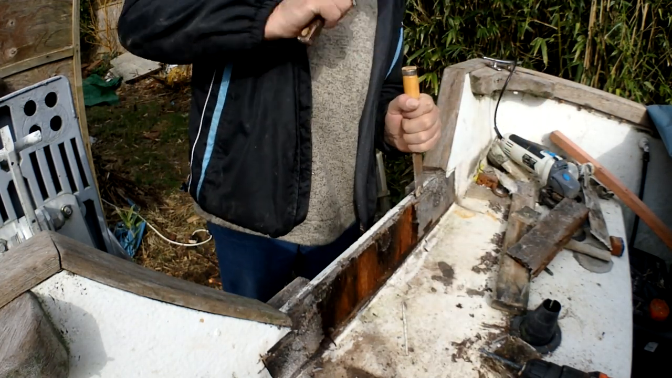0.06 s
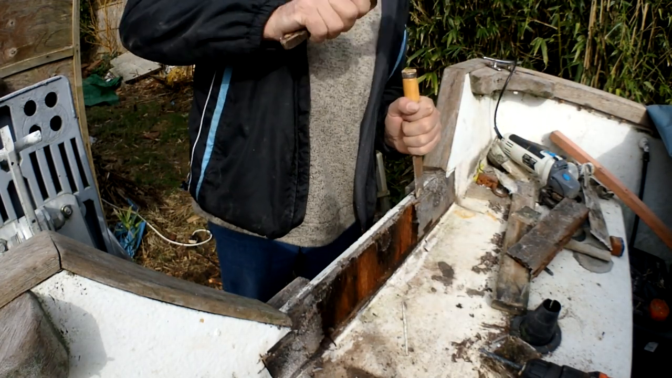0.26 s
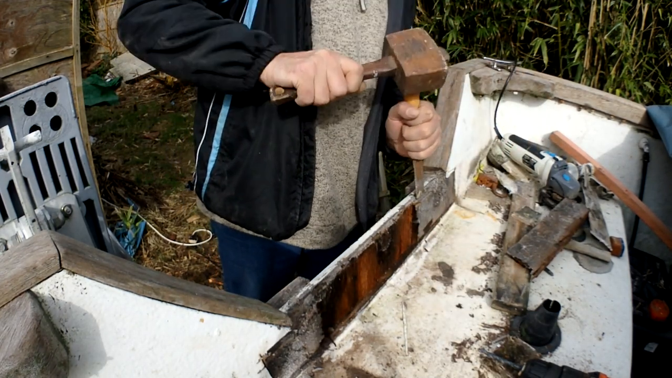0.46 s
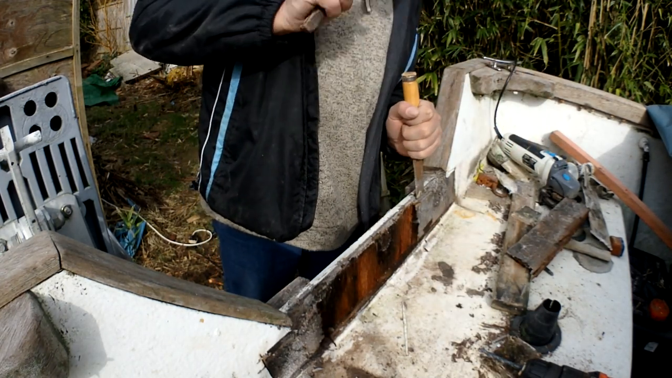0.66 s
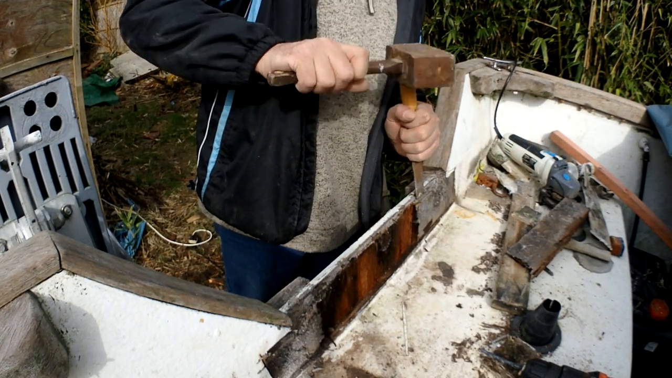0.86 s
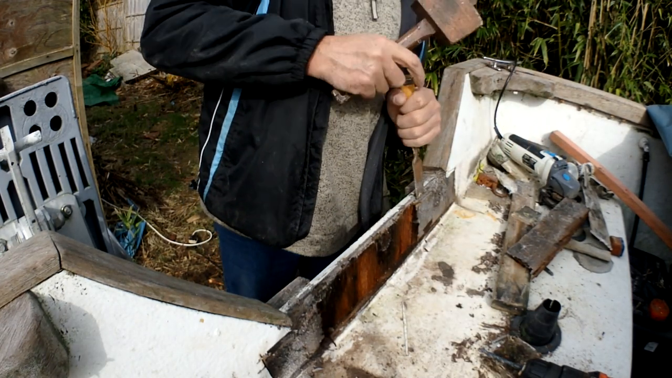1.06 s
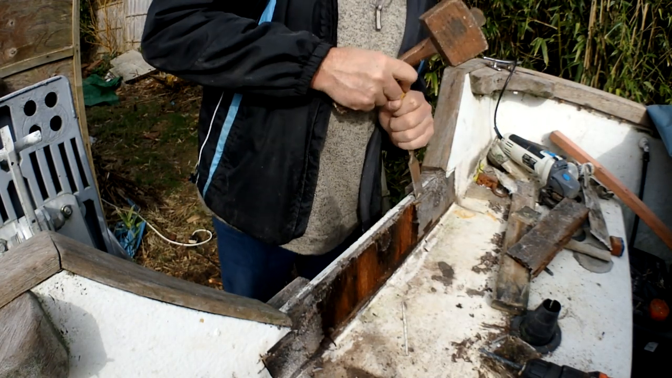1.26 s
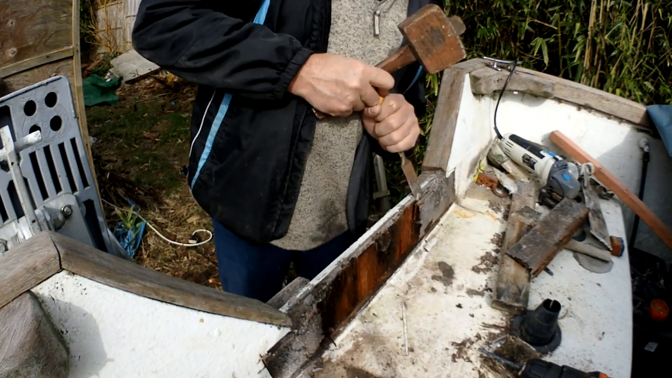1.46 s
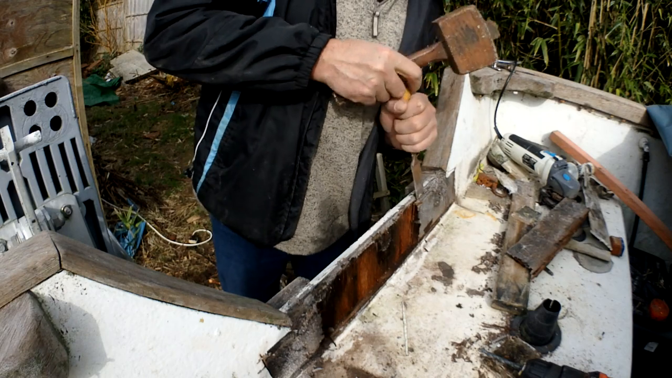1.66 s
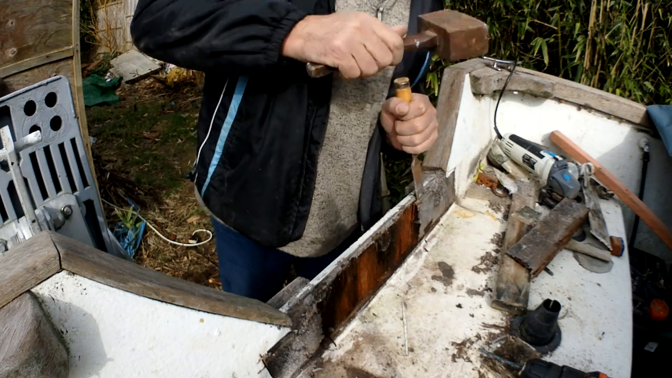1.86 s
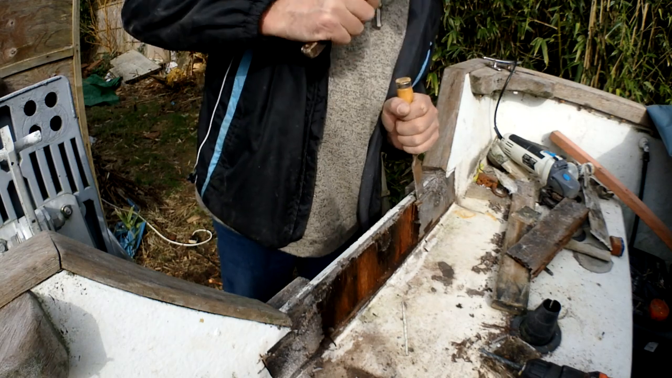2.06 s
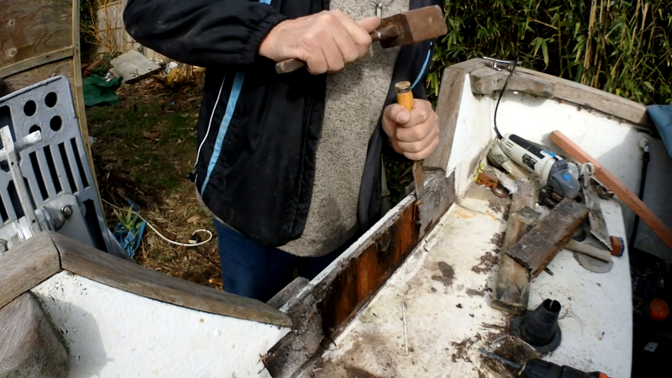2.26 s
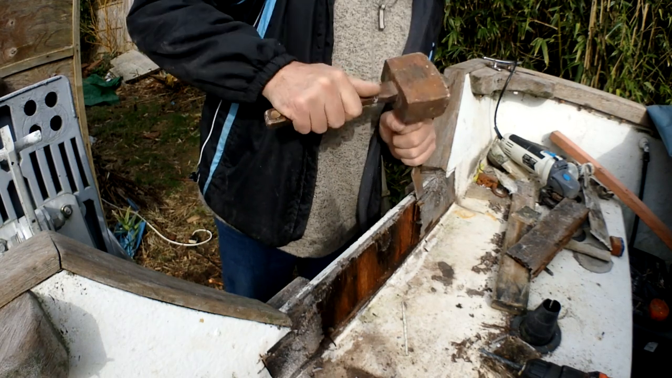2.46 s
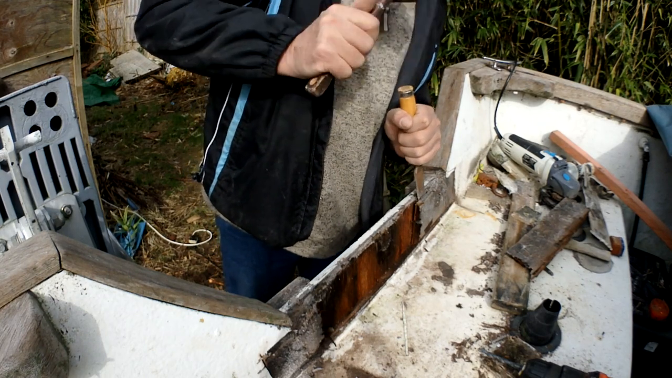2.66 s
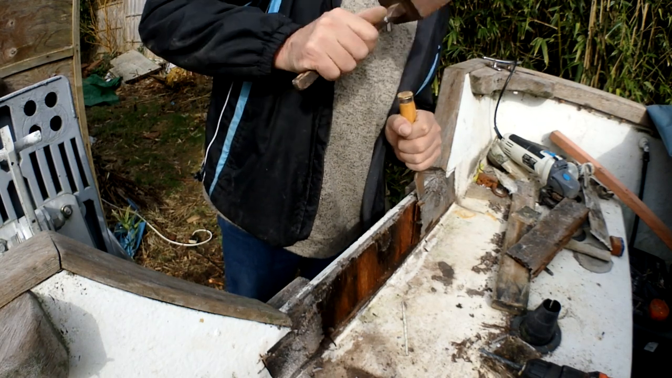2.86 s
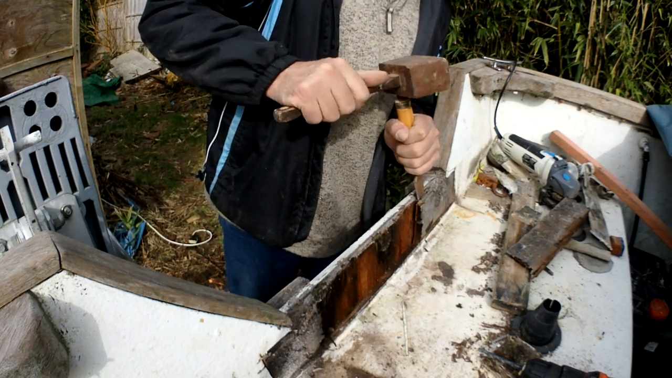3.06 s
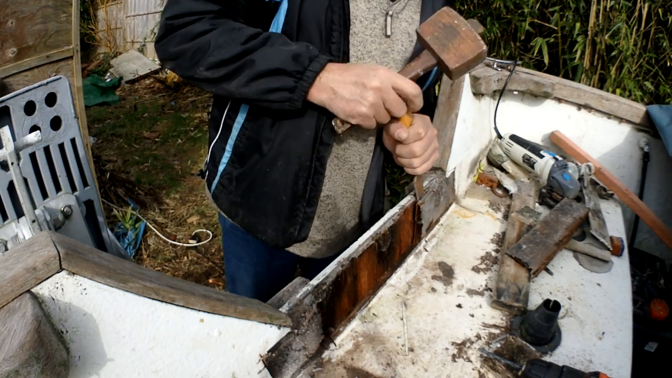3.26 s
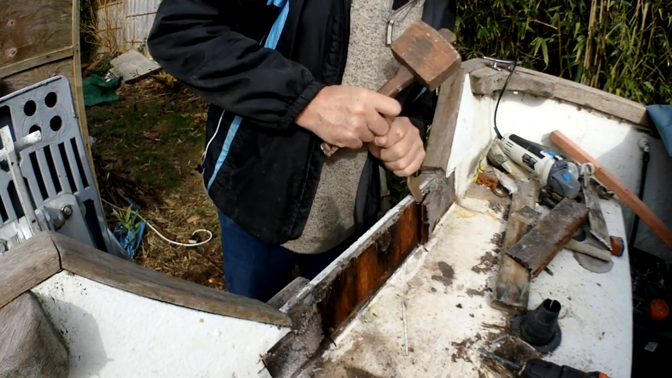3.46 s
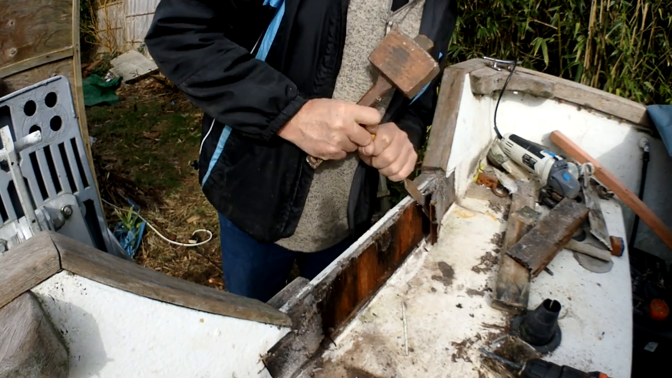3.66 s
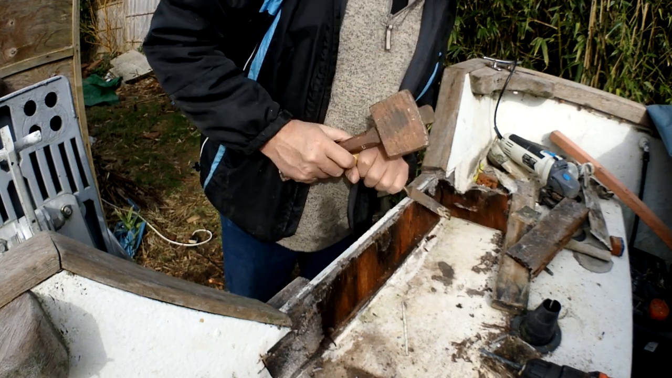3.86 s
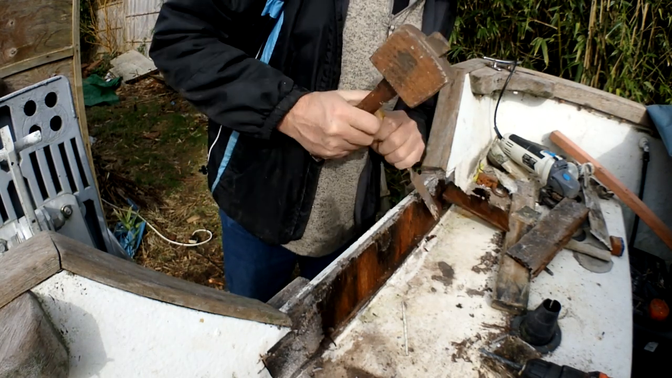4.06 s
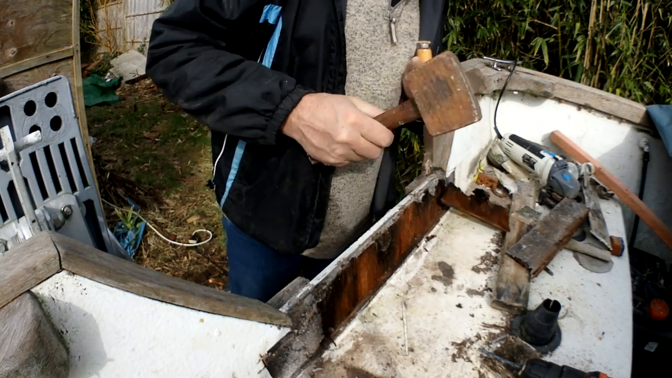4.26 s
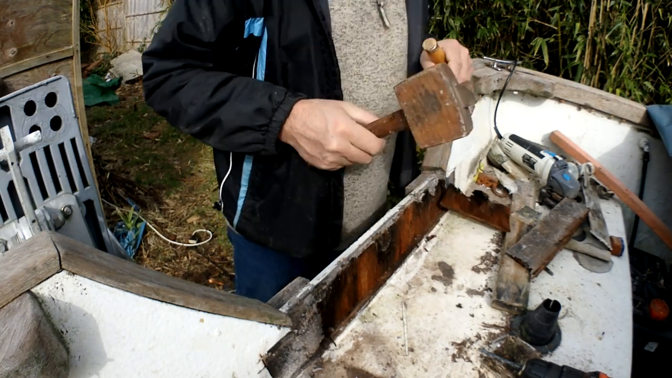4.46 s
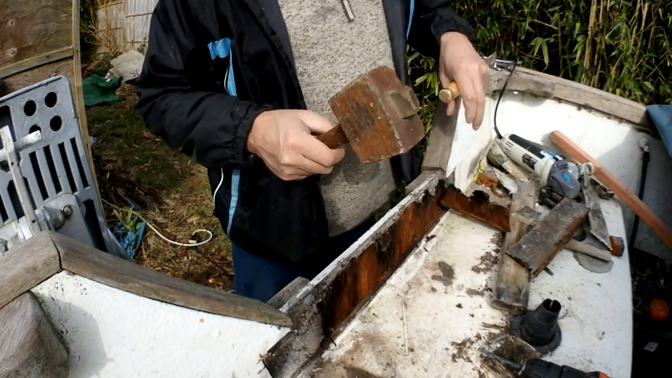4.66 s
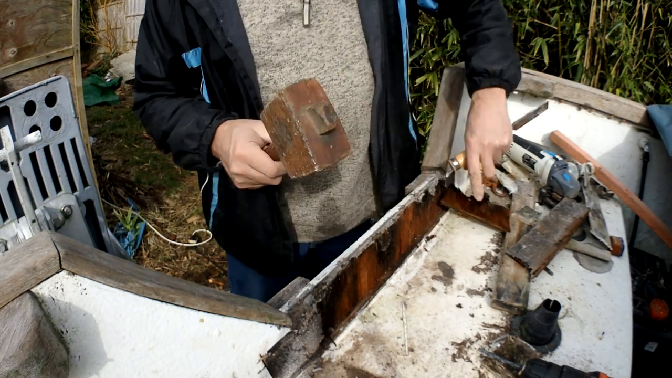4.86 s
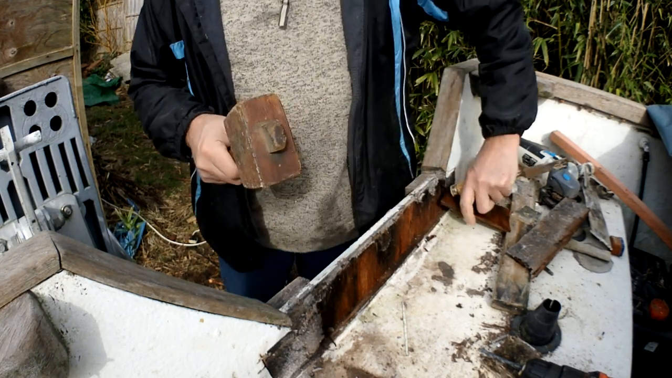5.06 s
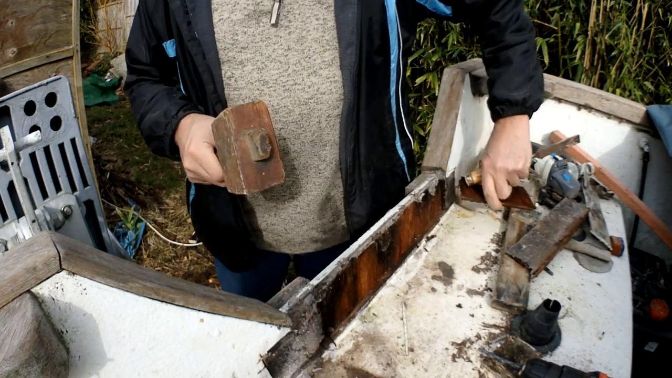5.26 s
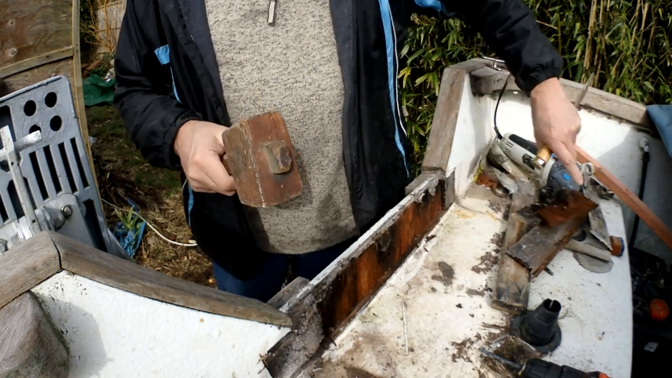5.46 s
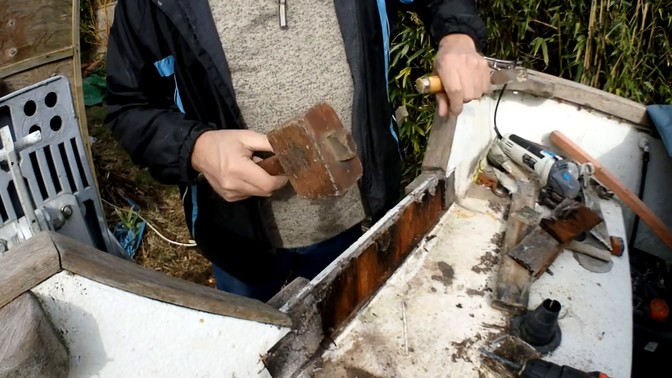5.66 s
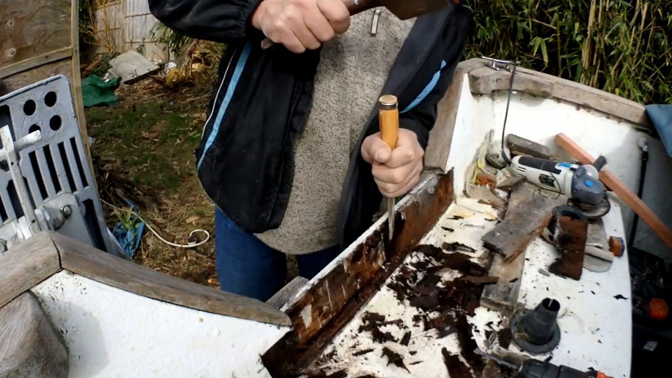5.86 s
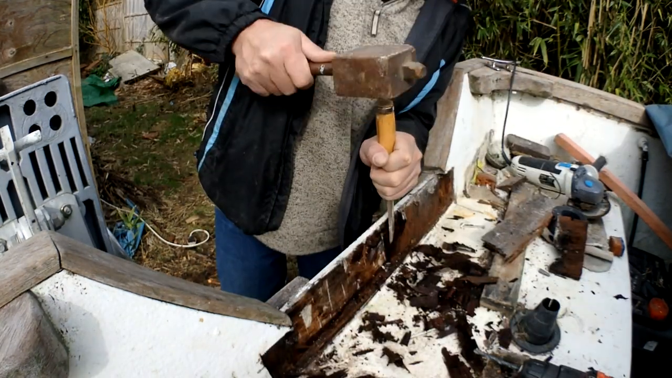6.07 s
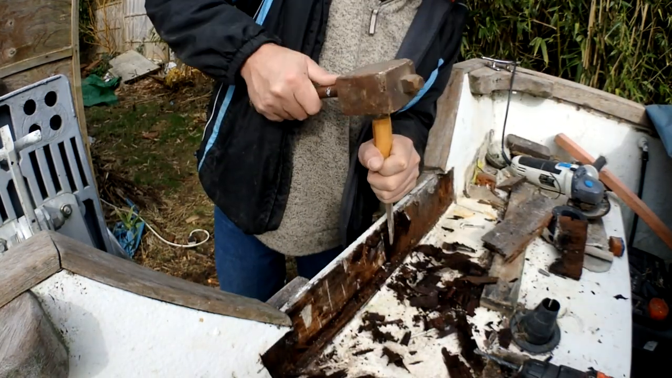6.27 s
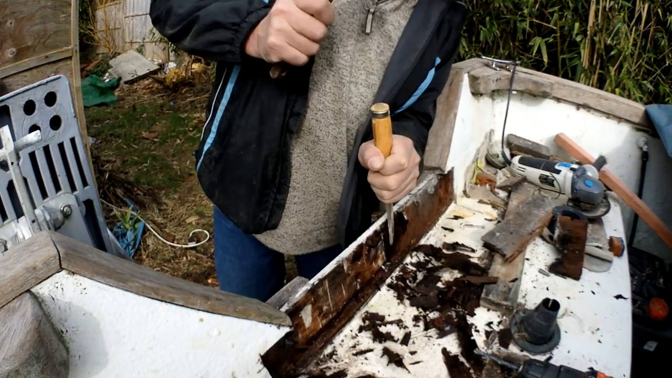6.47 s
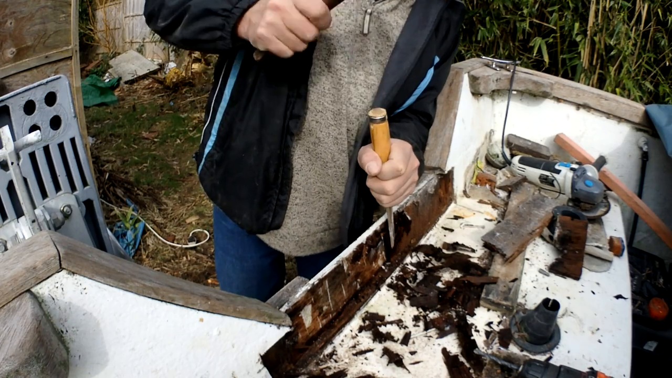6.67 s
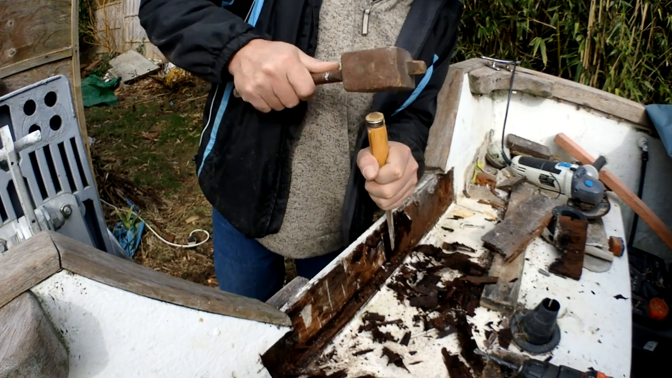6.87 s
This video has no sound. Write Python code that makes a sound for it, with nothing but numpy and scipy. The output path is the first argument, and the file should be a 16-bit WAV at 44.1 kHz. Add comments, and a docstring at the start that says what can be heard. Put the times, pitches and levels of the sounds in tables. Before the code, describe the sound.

Close outdoor stereo pickup of a mallet striking a chisel on a hollow boat hull. Three quick hard knocks, a pause with faint wood crackle and cloth rustle, four more blows, then a splintering snap and a loud crack as rotten wood comes away. Soft rustling and small clatter follow; after a tiny dropout, five evenly spaced knocks finish.

```python
"""Mallet and chisel on rotten planking

A wooden mallet drives a chisel in an open yard: short tool modes crack, longer modes of the hollow hull drum along,
band-wise noise gives the echoes. Between blows the levered chisel snaps fibres (clicks and noise bursts), pieces
fall and bounce, a block tocks, cloth and crumbs rustle (grainy noise) over an outdoor hum (smooth noise), and a
faint narrow tone comes and goes. The sound fades out and back once, within 0.1 s, before the last five blows."""
import sys
import numpy as np
from scipy import signal
from scipy.io import wavfile

SR = 44100
rng = np.random.default_rng(int(sys.argv[2]) if len(sys.argv) > 2 else 0)


def wav_record(signal):
    """Record a signal, one row per channel, as 16-bit PCM in the file named by sys.argv[1]."""
    frames = np.transpose(np.atleast_2d(signal))
    bounded = np.clip(frames, -1, 1)
    # unit amplitude maps onto the largest positive 16-bit level
    quanta = np.round(bounded * 32767).astype(np.int16)
    wavfile.write(sys.argv[1], SR, quanta)


N = 304731
SILENCE_S = 5.745   # bottom of the fade; no hit rings across it

# Mallet on chisel. Each row: start in seconds, level in dB, hull boom in dB, knock in dB, clack in dB,
# steel ring in dB, treble edge in dB, pitch factor of the tool.
BLOWS = [(0.175, -4, 8.5, 4, -0.5, -2.5, -42.5, 1.035), (0.505, -4.5, 5.5, 6, -4.5, -2.5, -44, 1.033),
         (0.827, -5, -4, -4, 3.5, -0.5, -5, 1.06), (2.214, -4.5, 8.5, -2.5, 3, -3, 6, 1.106),
         (2.5, -3.5, 2.2, -7.5, 0.5, -2.5, 2.5, 1.107), (2.775, -7, 1, -3.5, 1, 3, -3.5, 1.07),
         (3.033, -9, -5.5, -2, 4, 1, 5.5, 1.203), (5.799, -5, -5.5, 0.5, -4.5, 0.5, -1, 1.035),
         (6.056, -7.5, -4.5, 0.5, -2, 1, -5.5, 1.048), (6.319, -7.5, -2, 2, -2.8, 0, -1, 1.025),
         (6.575, -8, -0.5, 3, -3, -1.5, -15.5, 1.013), (6.836, -7, 3, 3, -1.5, -2.5, -4, 1.02)]
# Wood breaking off, falling and bouncing on the hull. Each row: start in seconds, level in dB, hull boom in dB,
# knock in dB, clack in dB, treble edge in dB, pitch factor of the plank, left-right in dB, late echo in dB.
PIECES = [(1.46, -30, -13, -4.5, 2.5, -7, 0.88, -5.5, 2.5),
          (3.739, -5, -29.5, -11.5, 0.5, -9, 1.03, -5.5, -2.5),
          (5.562, -22, 9, 20.5, 18.5, -26, 0.91, -6.5, 4.5),
          (5.57, -19.5, 4.5, -12.5, 6.5, -47.5, 0.83, -8.5, 0),
          (5.591, -25.5, -6.5, -13.5, -11.5, -29.5, 0.98, -1, 1),
          (5.657, -11.5, -13, -3, 14, -41, 0.94, -7.5, 6)]


def from_db(db):
    """Gain of a level in dB."""
    return 10 ** (np.asarray(db) / 20)


def in_time(rows):
    """A curve (s, value) read at every sample."""
    return np.interp(np.arange(N) / SR, *np.transpose(rows))


def at_hz(points, hz):
    """A table (Hz, value) read on a log-frequency axis."""
    points = np.array(points)
    return np.interp(np.log(hz), np.log(points[:, 0]), points[:, 1])


def drift(rate_hz):
    """Slow random curve of spread 1: noise through two equal low-pass poles, at a 40th of the sample rate."""
    r = np.exp(-80 * np.pi * rate_hz / SR)
    slow = signal.lfilter([1], [1, -2 * r, r * r], rng.standard_normal(N // 40 + 2002))
    slow = slow[2000:]   # settled part
    return np.interp(np.arange(N) / 40, np.arange(len(slow)), slow / slow.std())


def band_pass(x, low_hz, high_hz):
    """Second-order Butterworth band-pass."""
    return signal.sosfilt(signal.butter(2, [low_hz, high_hz], "band", fs=SR, output="sos"), x)


def resonance(x, hz, width_hz):
    """Band-pass with gain 1 on top."""
    r = np.exp(-np.pi * width_hz / SR)
    zeros = np.array([1, 0, -1]) * (1 - r * r) / 2
    return signal.lfilter(zeros, [1, -2 * r * np.cos(2 * np.pi * hz / SR), r * r], x)


def ring(hz, t60_s, lead_rad, rise_cycles):
    """One mode swelling over some cycles and dying away, the left side leading in phase."""
    t = np.arange(int(t60_s * SR * 1.2)) / SR
    onset = 1 - np.exp(-t * hz / rise_cycles)
    phase = 2 * np.pi * hz * t + lead_rad / 2 * np.array([[1], [-1]])
    return onset * from_db(-60 * t / t60_s) * np.sin(phase)


def noise_bands():
    """Noise bands 0.4 octave wide: centre in Hz, width in Hz and two unrelated signals of rms 1."""
    edges_hz = 28 * 2 ** np.arange(0, 9.4, .4)
    white = rng.standard_normal((2, 2, N))
    for k, (low, high) in enumerate(zip(edges_hz, edges_hz[1:])):
        pair = band_pass(white[k % 2], low, high)   # neighbours use different noise
        yield np.sqrt(low * high), high - low, pair / pair.std()


def stereo(pair, likeness):
    """Left and right from a shared and an opposed noise."""
    alike = np.clip(likeness, -1, 1)
    shared = np.sqrt(1 + alike) * pair[0]
    opposed = np.sqrt(1 - alike) * pair[1] * [[1], [-1]]
    return (shared + opposed) / np.sqrt(2)


def add(out, s, sound):
    """Mix a short stereo sound in at time s, cut at the silence if it starts before."""
    start = round(s * SR)
    end = round(SILENCE_S * SR) if s < SILENCE_S else N
    out[:, start:min(start + sound.shape[1], end)] += sound[:, :end - start]


def hum_db():
    """The hum sinks at every blow or loud piece, stays down, then creeps back."""
    sunk_db, stays_s, creep_db_per_s = -71.5, 0.67, 16
    loud_piece_db = -12
    t = np.arange(N) / SR
    loud = [row[0] for row in BLOWS] + [row[0] for row in PIECES if row[1] > loud_piece_db]
    loud = np.sort([0] + loud)
    since_s = t - loud[np.searchsorted(loud, t, "right") - 1]
    return sunk_db + creep_db_per_s * np.maximum(since_s - stays_s, 0)


def background():
    """Smooth outdoor hum and the grainier rustle of jacket cloth and crumbling wood, from the same noise bands."""
    # Each row: frequency in Hz, relative level in dB per Hz.
    hum_spectrum = [(15, -43), (25, -25), (145, -4), (263, -8.5), (301, -11), (427, -5.5), (1480, -18.5),
                    (1890, -18.5), (2220, -20.5), (4610, -25), (5140, -39.5), (6210, -38), (14400, -30),
                    (16000, -41)]
    rustle_spectrum = [(290, -43.5), (500, -11.5), (784, -12), (933, -3.5), (1030, -10.5), (1340, -7.5),
                       (3250, -8.5), (5240, -6.5), (6510, -19), (7310, -12.5), (11300, -24), (14500, -44.5),
                       (16000, -48)]
    # Each row: time in seconds, dB added to the hum bands below 250 Hz.
    hum_bass = [(0, -1.7), (4.2, -2.6), (4.75, 5), (5.5, 2.5), (5.8, 0.7), (6.91, 1.4)]
    # Rustle ahead of the fade. Each row: time in seconds, level in dB.
    rustle_level = [(0, -86.5), (.68, -76.5), (1.0, -76.5), (1.344, -62), (1.466, -53), (1.52, -68.5),
                    (1.576, -74), (1.656, -62), (1.784, -68.5), (1.984, -64.5), (2.072, -71.5), (2.2, -68),
                    (2.38, -75.5), (2.66, -80), (2.95, -83), (3.2, -75.5), (3.32, -67.5), (3.404, -70.5),
                    (3.63, -68), (3.85, -65.5), (4.096, -67), (4.186, -61.5), (4.342, -57.5),
                    (4.564, -66.5), (4.616, -73.5), (5.2, -69.5), (5.24, -66.5), (5.44, -75), (5.55, -65.5),
                    (5.77, -76), (6.25, -84), (6.91, -76)]
    # Each row: frequency in Hz, left-right likeness.
    background_likeness = [(60, 0.3), (180, 0.4), (550, 0.5), (1650, 0.8), (4970, 0.26), (15000, 0.096)]
    hum, rustle = 0, 0
    grains = from_db(0.85 * drift(98))   # cloth and crumbs come in tiny clumps
    for hz, width_hz, pair in noise_bands():
        band = np.sqrt(width_hz) * stereo(pair, at_hz(background_likeness, hz))
        bass_db = (hz < 250) * in_time(hum_bass)
        hum = hum + from_db(at_hz(hum_spectrum, hz) + 2.5 * drift(8) + bass_db) * band
        # time-reversed, so that it does not follow the hum
        rustle = rustle + from_db(at_hz(rustle_spectrum, hz)) * band[:, ::-1] * grains
    hum = from_db(hum_db()) * hum / hum.std()
    rustle = from_db(in_time(rustle_level)) * rustle / rustle.std()
    return (hum + rustle) * from_db([[-.6], [.6]])


def all_hits():
    """Every hit with the shared colour of its kind, shifted where its boom, knock, clack and edge sit."""
    # What all hits of a kind share. Each row: frequency in Hz, level in dB.
    blow_colour = [(130, -38), (300, -30), (550, -23), (900, -14), (1500, -15), (2600, -16), (4800, -14.5),
                   (8000, -21), (14000, -18.5)]
    piece_colour = [(130, -13), (300, -17), (550, -23.5), (900, -25), (1500, -25.5), (2600, -21.5),
                    (4800, -12.5), (8000, -12.5), (14000, -42.5)]
    hits = []
    # lean_db: left-right; late_db: far echoes; ring: length factor of hull modes and echoes
    for s, db, boom, knock, clack, steel, edge, pitch in BLOWS:
        shift = [(300, boom), (550, 0), (900, knock), (1500, 0), (2600, clack), (4800, steel), (14000, edge)]
        hits.append(dict(s=s, db=db, colour=blow_colour, shift=shift, pitch=pitch,
                         lean_db=-6, late_db=-3, ring=0.84))
    for s, db, boom, knock, clack, edge, pitch, lean_db, late_db in PIECES:
        shift = [(200, boom), (450, knock), (1500, clack), (4800, 0), (8000, edge), (14000, 0)]
        hits.append(dict(s=s, db=db, colour=piece_colour, shift=shift, pitch=pitch,
                         lean_db=lean_db, late_db=late_db, ring=1))
    return hits


def strength(hit, hz):
    """Left and right gain of one hit at this pitch."""
    # Each row: frequency in Hz, left-right in dB, on top of the lean of the hit.
    hit_balance = [(60, 2.5), (250, 6.5), (1000, 6.5), (4000, 0), (8000, 7), (14000, -9.5)]
    level_db = hit["db"] + at_hz(hit["colour"], hz) + at_hz(hit["shift"], hz)
    left_right_db = hit["lean_db"] + at_hz(hit_balance, hz)
    return from_db(level_db + left_right_db / 2 * np.array([[1], [-1]]))


def tool_cracks(hits):
    """Short modes of tool and plank crack at once, and louder as the blow comes back up the steel."""
    # Each row: frequency in Hz ahead of the pitch factor, level in dB, t60 in seconds, left lead in radians.
    tool_modes = [(769, 9, 0.013, 0), (1238, 4, 0.013, -0.9), (1390, 7, 0.015, 0.87),
                  (2135, 5.5, 0.012, 0.83), (3035, 2.5, 0.011, 1.6), (3140, 2, 0.012, -2.8),
                  (3986, 7.5, 0.0046, 0.9), (4770, 1.5, 0.0083, -0.42), (5570, 2, 0.0019, 0),
                  (6230, -4.5, 0.0066, 1.5), (8960, -1, 0.0026, 1), (10570, 1.5, 0.0025, 2.06),
                  (13600, 3, 0.0027, 1.5), (15300, -0.5, .004, -1.5)]
    out = np.zeros((2, N))
    for hit in hits:
        for hz, level_db, t60_s, lead_rad in tool_modes:
            first_db, second_db = 1.8 * rng.standard_normal(2)
            sound = strength(hit, hz) * ring(hz * hit["pitch"], t60_s, lead_rad, 0.38)
            add(out, hit["s"] + .0016, sound * from_db(level_db - 12 + first_db))
            add(out, hit["s"] + .0027, sound * from_db(level_db + second_db))
    return out


def hull_drum(hits):
    """Longer modes of the hollow hull answer a little later, the low ones last."""
    # Each row: frequency in Hz ahead of the hull pitch, level in dB, t60 in seconds ahead of the ring factor,
    # left lead in radians.
    hull_modes = [(115.3, -1, 0.19, 1), (147, -1.5, 0.32, 1.8), (198.5, -9.5, .5, 1.9),
                  (220, -1.5, 0.31, 0.92), (245, 0.5, 0.18, 1.1), (291.4, -5, 0.26, 1.7),
                  (353.7, -2, .18, 0.86), (445, -5.5, 0.11, 2), (468, -4.5, 0.13, 1.8), (514, -4, 0.13, .7),
                  (570, -9, 0.14, .6), (686, -13.5, 0.056, 0.55), (770, -6, 0.036, .4),
                  (848, -15.5, 0.076, .4), (1000, -10.5, 0.041, .3), (1063, -13, 0.12, .3),
                  (1227, -20, 0.11, 0.16), (1322, -22.5, .07, .1), (1460, -12.5, .07, .1),
                  (1690, -16.5, 0.049, .1)]
    hull_pitch = .97
    out = np.zeros((2, N))
    for hit in hits:
        for hz, level_db, t60_s, lead_rad in hull_modes:
            level_luck, pitch_luck = rng.standard_normal(2)
            late_s = .003 + 1.1 / hz
            pitch_hz = hz * hull_pitch * (1 + .02 * pitch_luck)
            gain = strength(hit, hz) * from_db(level_db + 2 * level_luck)
            add(out, hit["s"] + late_s, gain * ring(pitch_hz, t60_s * hit["ring"], lead_rad, 0.44))
    return out


def echoes(hits):
    """Dense returns from hull and yard: noise that dies band by band, fast at first, then in a thin uneven tail."""
    # Each row: frequency in Hz, t60 of the far returns in seconds ahead of the ring factor.
    echo_t60 = [(60, .3), (210, .25), (400, .23), (1470, .24), (3880, .26), (6000, .23), (10200, .12)]
    # Each row: frequency in Hz, level in dB.
    echo_level = [(60, -47.5), (150, -3.5), (400, -2.5), (1000, -12.5), (2500, -16.5), (5000, -22),
                  (7000, -21), (10000, -25), (14000, -48)]
    # Each row: frequency in Hz, left-right likeness.
    echo_likeness = [(60, 0.53), (130, 1), (250, 1), (500, 0.4), (1000, 1), (4000, 0.48), (12000, .5)]
    near_db, far_db = 1, -6
    out = 0
    lumps = from_db(2 * drift(60))
    t = np.arange(SR // 2) / SR
    for hz, _, pair in noise_bands():
        envelope = np.zeros((2, N))
        rise = 1 - np.exp(-t / (0.00031 + 0.38 / hz))
        for hit in hits:
            fall_db = -60 * t / (at_hz(echo_t60, hz) * hit["ring"])
            near = from_db(fall_db * 6.3 + near_db)   # dies 6.3 times faster
            far = from_db(fall_db + far_db + hit["late_db"])
            gain = strength(hit, hz) * from_db(at_hz(echo_level, hz))
            add(envelope, hit["s"] + 0.0028, gain * rise * (near + far))
        out = out + envelope * lumps * stereo(pair, at_hz(echo_likeness, hz))
    return out


def faint_snaps(count=5):
    """A few small snaps at random moments of each levering."""
    # Chisel being levered. Each row: start in seconds, end in seconds.
    levering = [(1.34, 1.5), (3.499, 3.73)]
    level_db, spread_db, high_db, low_db = -52, 1, -10, -10
    rows = []
    for start, end in levering:
        for u, v in rng.random((count, 2)):
            rows.append((start + u * (end - start), level_db + spread_db * (2 * v - 1), high_db, low_db))
    return rows


def snaps():
    """Fibres snap: a click and a noise burst of a few ms in three bands, with a fainter crumbling tail."""
    # Each row: start in seconds, level in dB, relative level above 7 kHz in dB, relative level of the low band
    # (1.2 to 4.2 kHz) in dB.
    strong_snaps = [(1.35, -42, -26, -25), (1.3813, -41.5, -16, -10), (1.417, -41, -17, -17),
                    (1.4408, -39.5, -6, -10), (1.4714, -51, -2, -11), (1.4832, -45.5, 3.5, -5),
                    (1.7212, -39, -27.5, -23), (1.7549, -49.5, -27, -26.5), (3.4324, -46.5, -37.5, -15.5),
                    (3.4411, -36, -47, -6), (3.478, -44.5, -22, -1), (3.498, -24, -3.5, -14),
                    (3.5142, -36, -11, -10), (3.529, -37, -23, -11), (3.5498, -40, -13, -12),
                    (3.5796, -45, -8.5, -21), (3.609, -49.5, -12, -2), (3.675, -46, -18, -7),
                    (3.726, -50.5, -24, 3)]
    snap_t60_s, crumble_t60_s, crumble_db = 0.0088, .09, -9.5
    rows = np.array(strong_snaps + faint_snaps())
    out = np.zeros(N)
    for low_hz, high_hz, band_db in [(3760, 5540, 0), (7000, 10300, rows[:, 2]), (1200, 4200, rows[:, 3])]:
        clicks = np.zeros(N) + 1e-18   # never quite zero
        clicks[(rows[:, 0] * SR).astype(int)] = from_db(rows[:, 1] + band_db)
        snap = signal.lfilter([1], [1, -from_db(-60 / (snap_t60_s * SR))], clicks)
        crumble = from_db(crumble_db) * signal.lfilter([1], [1, -from_db(-60 / (crumble_t60_s * SR))], clicks)
        burst = (snap + crumble) * rng.standard_normal(N)
        out += band_pass(burst + 6.1 * clicks, low_hz, high_hz)
    return out * from_db([[-1.5], [1.5]])


def tock():
    """A soft contact: the few modes of a loose block swell over a cycle and ring unevenly."""
    # Each row: frequency in Hz, level in dB, t60 in seconds, left lead in radians.
    block_modes = [(175.5, -9.5, 0.23, 1.1), (464, 3.5, 0.066, 0.66), (644, -12.5, 0.05, 0.48),
                   (1034, -13, 0.087, 0.24)]
    # Each row: start in seconds, level in dB.
    tock_times = [(1.836, -54), (3.946, -36)]
    wobble_db = 2
    out = np.zeros((2, N))
    for hz, level_db, t60_s, lead_rad in block_modes:
        sound = ring(hz, t60_s, lead_rad, 0.98)
        sound = sound * from_db(level_db + wobble_db * drift(56)[:sound.shape[1]])
        for s, db in tock_times:
            add(out, s, from_db(db) * sound)
    return out


def tone():
    """A faint narrow tone comes and goes: noise twice through one narrow resonance."""
    # Each row: time in seconds, level in dB ahead of the fade.
    tone_level = [(0, -110), (5.05, -110), (5.17, -70), (5.3, -74), (5.44, -69), (5.52, -110), (6.91, -110)]
    hz, width_hz = 1940, 60   # width of each pass
    narrow = resonance(resonance(rng.standard_normal(N), hz, width_hz), hz, width_hz)
    return from_db(in_time(tone_level)) * narrow / narrow.std()


def scene():
    """All sources, with the one fade; the hits carry no deep bass."""
    # Each row: time in seconds, gain in dB.
    fade = [(0, 1), (5.705, 2.5), (5.72, -5), (5.735, -59), (5.755, -46.5), (5.765, 6), (5.79, 3.5),
            (6.91, 3)]
    hits = all_hits()
    struck = tool_cracks(hits) + hull_drum(hits) + echoes(hits)
    struck = signal.sosfilt(signal.butter(2, 75, "high", fs=SR, output="sos"), struck)
    return (background() + struck + snaps() + tock() + tone()) * from_db(in_time(fade))


def record(dry):
    """The left port hears a sample later; the capsule lifts three bands between 4 and 8 kHz; the top is cut."""
    wet = np.array([np.roll(dry[0], 1), dry[1]])
    for hz, width_hz, gain in [(4195, 660, 0.45), (5480, 710, 1.6), (7550, 300, 0.81)]:
        wet = wet + gain * resonance(wet, hz, width_hz)
    cutoff_hz = 17200   # 70 dB down from here up
    return signal.sosfilt(signal.cheby2(12, 70, cutoff_hz, fs=SR, output="sos"), wet)


dry = scene()
out = record(dry)
wav_record(out)
```